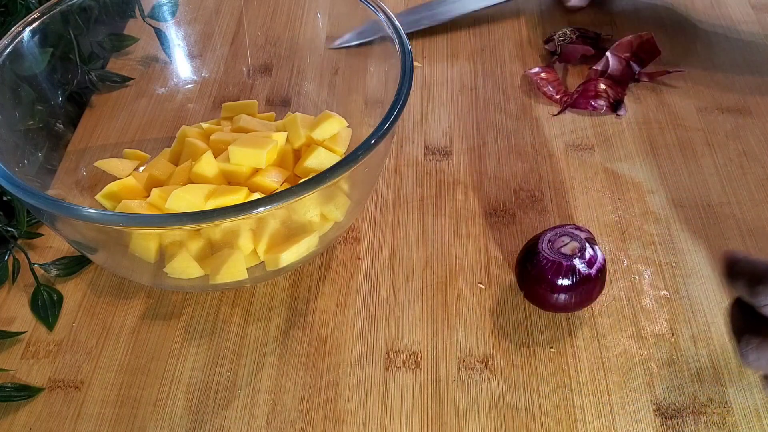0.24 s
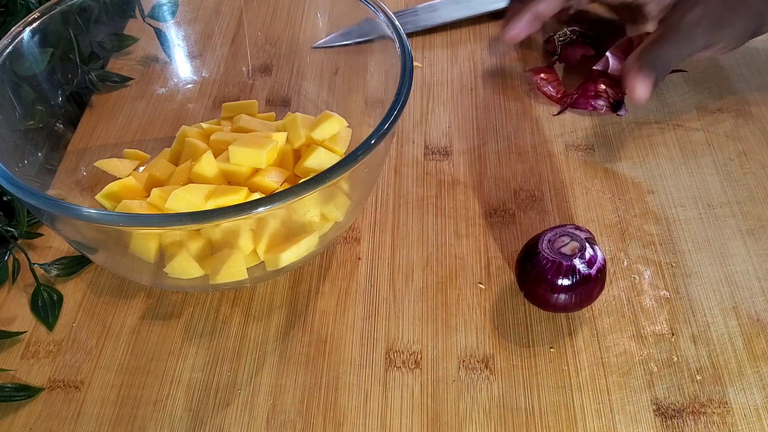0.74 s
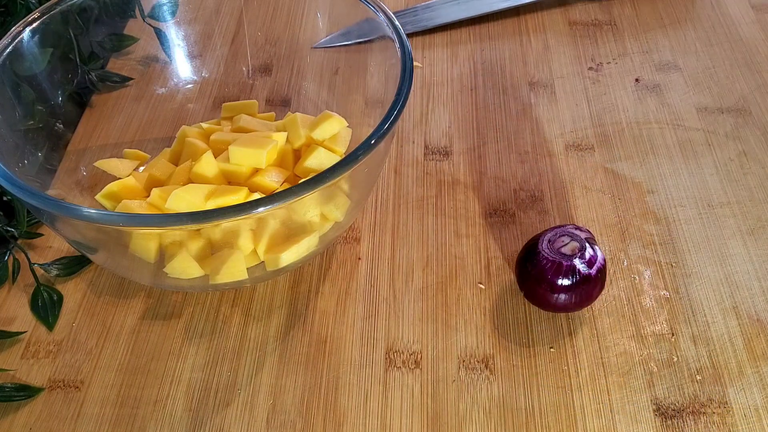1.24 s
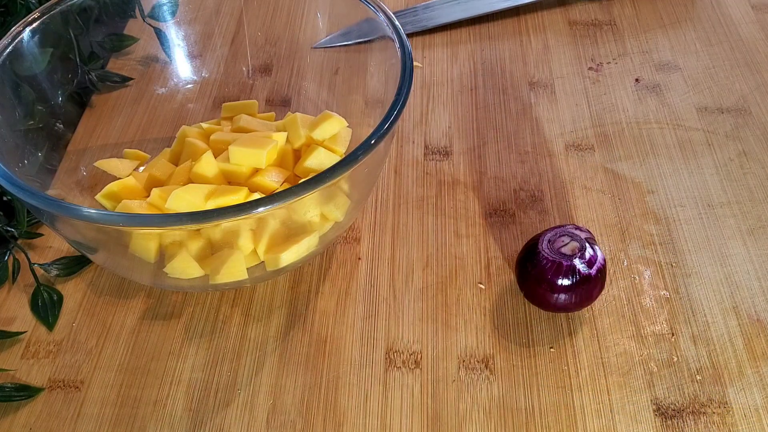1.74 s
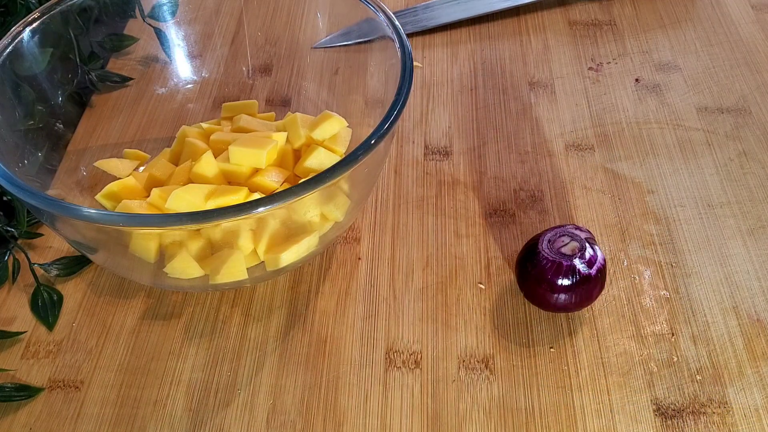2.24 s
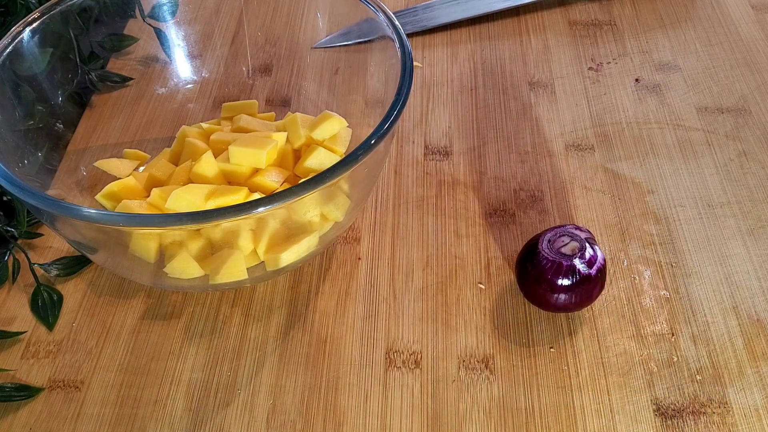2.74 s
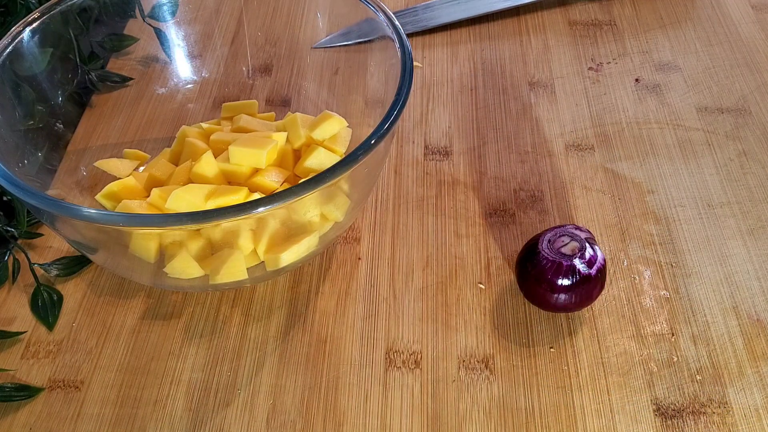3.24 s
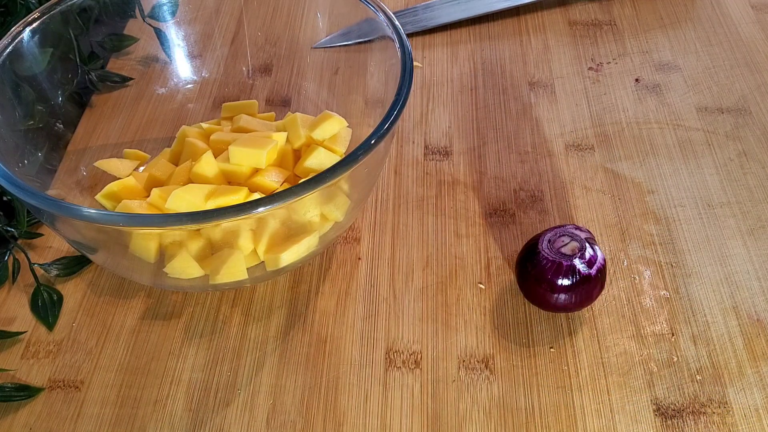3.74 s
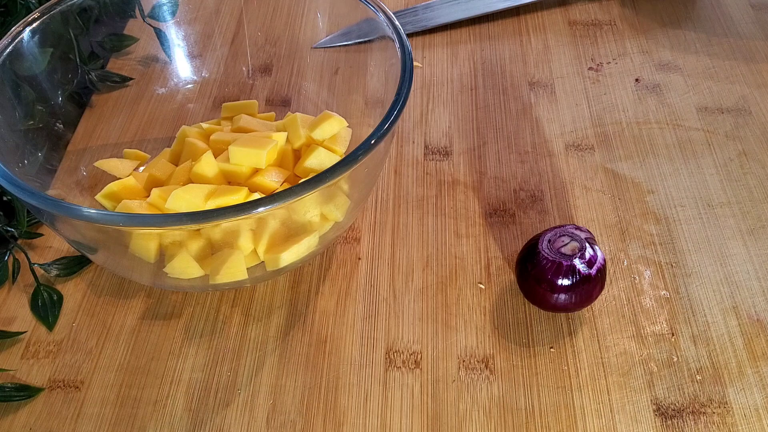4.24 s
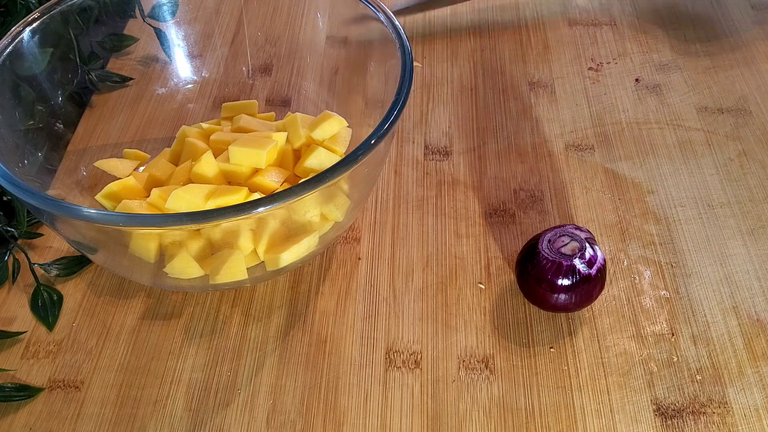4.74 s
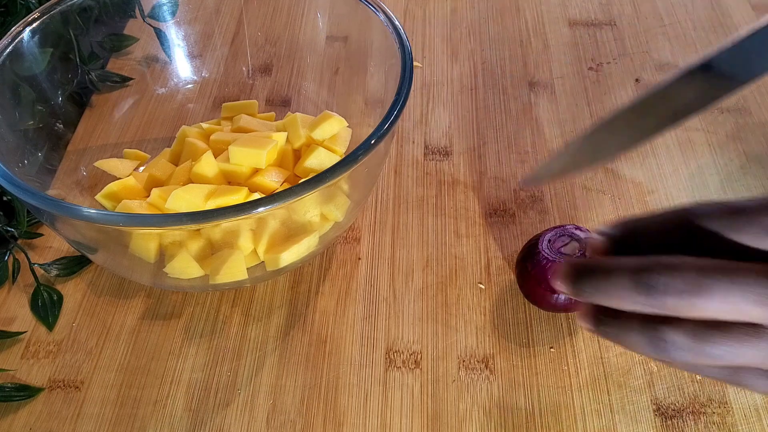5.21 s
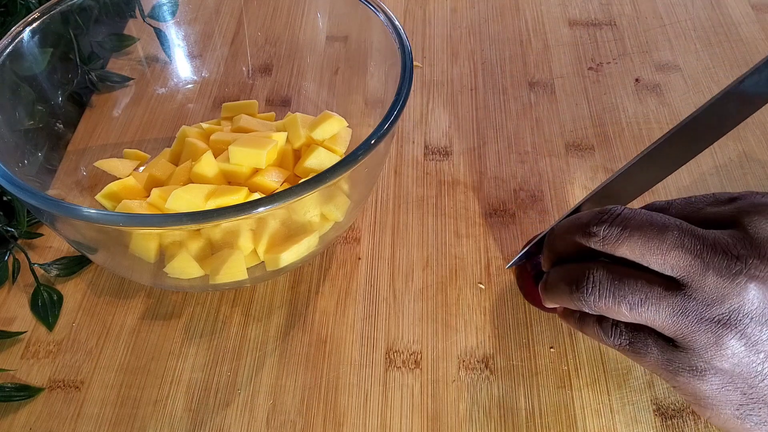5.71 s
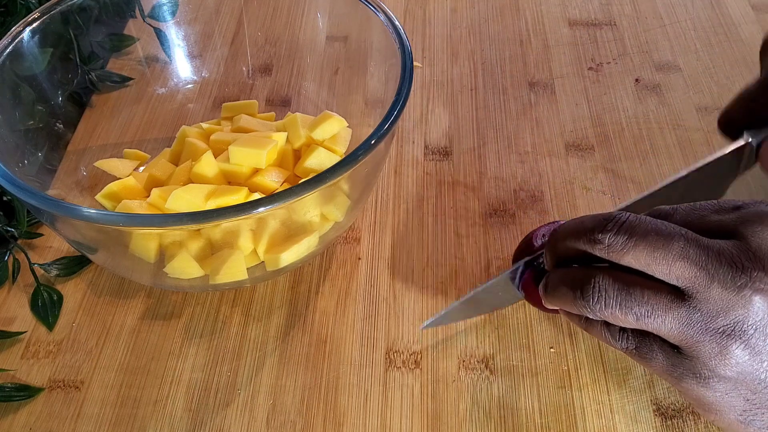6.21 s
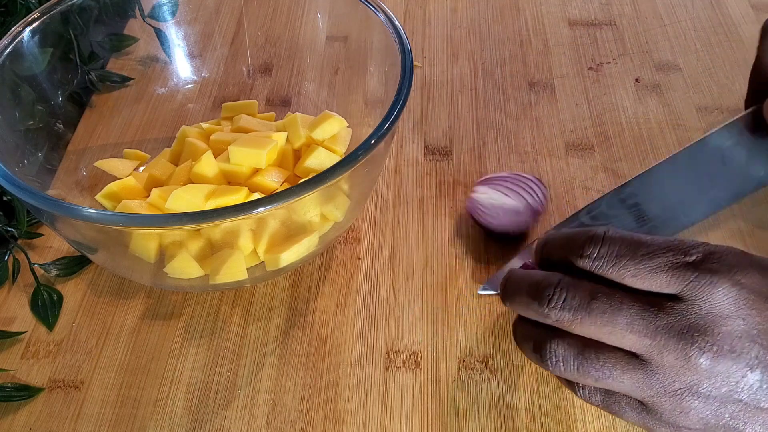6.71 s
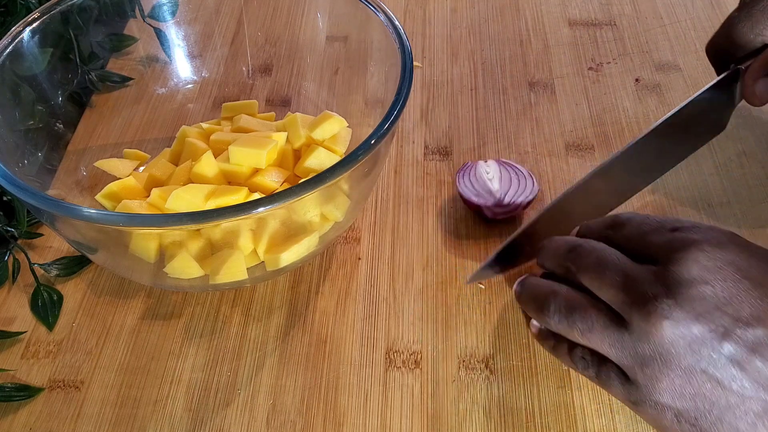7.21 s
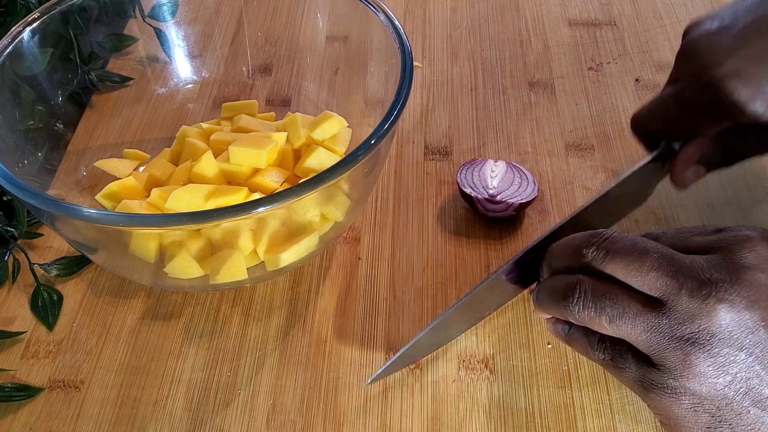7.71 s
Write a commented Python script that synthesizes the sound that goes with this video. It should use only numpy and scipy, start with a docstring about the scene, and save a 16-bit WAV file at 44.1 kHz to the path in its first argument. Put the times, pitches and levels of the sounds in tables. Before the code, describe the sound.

In a kitchen, a knife lands on a wooden board with a very loud, ringing double clack and soft thuds. Papery onion skins crackle close by, then rustle faintly across the room among small bumps. The knife is lifted with a light knock, crunches crisply through the onion and hits the board hard, followed by lighter knocks and scrapes. Close stereo microphones, short room reverberation, quiet low hum.

```python
"""First a knife rings and knocks as it is laid on a wooden board in a kitchen; dry onion skins crackle, then rustle
across the room among bumps. The knife is picked up again, crunches through the onion, knocks and scrapes.
A low hum runs underneath. Struck bodies are sums of dying sine waves (modes); crunches, scrapes and rustles
are tiny random snaps over noise, coloured and shaped by each movement; the hum is a few wavering sines."""
import sys
import numpy as np
from scipy import signal
from scipy.fft import rfft, irfft, next_fast_len
from scipy.io import wavfile

SR = 44100
rng = np.random.default_rng(int(sys.argv[2]) if len(sys.argv) > 2 else 0)


def master_out(mix):
    """Clip the mix to full scale and print it as 16-bit PCM to the path in sys.argv[1]."""
    frames = np.transpose(np.atleast_2d(mix))
    ceiling = np.clip(frames, -1, 1)
    pcm = np.round(ceiling * 32767).astype(np.int16)
    wavfile.write(sys.argv[1], SR, pcm)


N = 351036  # length in samples

# The knife meets the board: t/s, level/dB, contact cut-off f/Hz, then levels within the blow:
# counter thump/dB, board belly/dB, crack/dB, blade ring/dB, and the share sent to the room/dB
KNOCKS = [(0.1509, 4.5, 3770, -3.5, -10.5, 0, -38, -5.5), (0.155, -6, 12800, -11.5, -35, 5, -3, 2),
          (0.182, -7, 1980, -12, -6, -8, -3, 1.5), (4.508, -27.5, 3470, 7.5, -0.5, -10, -14, -4.5),
          (5.8341, 1, 1650, -1, 4, 12, -15, -10.5), (6.6822, -14.5, 4670, 5.5, 0.5, 0.5, 6.5, -6),
          (7.148, -4.5, 1830, 3, -1.5, -1.5, -12.5, -1), (7.893, -12, 1970, 1, 3.5, -5, 0, -6.5)]
# Hand, handle and onion bump softly on the board: t/s, level/dB, contact cut-off f/Hz
THUDS = [(0.31, -20.5, 501), (0.343, -19.5, 501), (0.42, -24, 463), (0.456, -25, 300), (0.775, -21.5, 170),
         (4.749, -32.5, 350), (4.871, -29.5, 105), (4.952, -30.5, 121), (5.278, -18.5, 118),
         (5.67, -23.5, 150), (5.764, -23.5, 337), (6.893, -22, 222), (7.084, -32.5, 200)]
# Levels within every thud, and its share sent to the room
THUD_THUMP_DB, THUD_BELLY_DB, THUD_STEEL_DB, THUD_ROOM_DB = 5.5, -1, -24, -1.5

# Modes, before a blow sets their levels: f/Hz, level/dB, time to fall by 60 dB/s
COUNTER_MODES = [(104.3, -21.5, 0.28), (148, -23.5, 0.14), (203, -21, 0.055)]  # counter under the board
BELLY_MODES = [(342.6, -20.5, 0.065), (431, -16, .085), (489.3, -14.5, 0.052), (631, -19, 0.059)]  # the board's belly
BOARD_MODES = [(790, -17, 0.052), (1083.6, -16, 0.042), (1146, -18.5, 0.11), (1254, -15, 0.04),
               (1585, -18.5, 0.053), (1870, -24, 0.03), (2544, -25, 0.036), (2930, -24, 0.043),
               (3905, -28.5, .02)]  # the board's stiffer bending
BLADE_MODES = [(926, -26, 0.25), (1199.4, -30.5, .18), (1820, -39.5, 0.62), (1990, -34.5, 0.21),
               (2350, -30.5, 0.2), (2560, -43, 0.25), (3250, -41.5, 0.29), (4200, -36, 0.2),
               (5170, -40.5, .33), (6105, -42, .25), (7480, -44.5, .25), (8345, -43, .3),
               (9670, -35.5, 0.27), (10800, -35, .25), (14550, -39.5, .2)]  # steel blade
# The free blade as it is swung in, and as it is lifted off the board: f/Hz, relative level/dB, 60 dB fall time/s
SWUNG = [(1066, -8.5, 0.33), (1470, -5, 0.22), (2358, -13, 0.3), (3880, -22, 0.36), (4452, -15, 0.13),
         (5300, -2.5, 0.25), (5701, -18, 0.24), (6400, -22.5, 0.39), (7472, -19, 0.2), (9792, -20.5, 0.36)]
LIFTED = [(1184, -9, 0.49), (1740, -6, 0.37), (2600, -2, 0.058), (5100, -24, 0.47), (6105, -22, 0.25),
          (7100, -22, 0.64), (7530, -18, 0.3), (11180, -13, 0.23)]
# The free blade rings: t/s, level/dB, its modes
CLINKS = [(0., -31.5, SWUNG), (4.509, -41, LIFTED)]

# The blade is dragged on wood or pushed through the onion:
# t/s, swell/s, hold/s, friction level/dB, body relative level/dB, brightness relative level/dB
STROKES = [(4.27, .045, .06, -61.5, 7.5, -7), (4.39, 0.015, 0.11, -53.5, 3, -2),
           (4.69, 0.05, 0.088, -59.5, 0, 0), (5.59, 0.13, .05, -45, -2, -0.5),
           (5.71, 0.12, 0.013, -32.5, -5.5, -7), (5.88, 0.025, 0.07, -40, 1.5, -3),
           (6.165, 0.01, 0.14, -60.5, 4, -5), (6.37, 0.042, 0.016, -57.5, -1, 1),
           (6.585, 0.043, 0.021, -45, 5, 1), (6.79, .05, .025, -62, -4, -9.5),
           (6.91, 0.018, .02, -63.5, 3, -2), (7.14, 0.056, 0.23, -50.5, 6, -1),
           (7.54, 0.016, 0.068, -56, 7.5, -5.5), (7.73, 0.036, 0.048, -43.5, 1, 0.5),
           (7.89, 0.033, .05, -53.5, 9, -4)]
# How strongly the blade sings, more once it is free of the onion: t/s, level relative to the friction/dB
SINGING = [(4.9, -27.5), (5.5, -18), (6.1, -15), (6.55, -19), (7.6, 1.5), (7.8, -12)]
SING_WANDER_DB, SING_WANDER_HZ = 5, 6  # size and rate of each singing mode's wandering

# The hand gathers the dry skins; then they are handled across the room:
# t/s, swell/s, hold/s, crackle or rustle level/dB, crumple relative level/dB, crispness relative level/dB
NEAR_RUSTLES = [(0.52, 0.047, 0.034, -59, 2, -3), (0.625, 0.032, 0.04, -46.5, -2, 3),
                (0.70, 0.067, 0.071, -45.5, 0, -1), (0.77, 0.098, 0.055, -41.5, -8.5, 2),
                (0.97, 0.029, 0.0093, -45, -8, -0.5)]
FAR_RUSTLES = [(1.235, 0.032, 0.25, -60.5, -6, -3), (1.305, 0.012, 0.039, -53.5, 2.5, -18.5),
               (1.60, 0.048, .13, -59, 0, 0.5), (1.82, .11, .025, -54.5, -0.5, -2),
               (2.17, 0.056, 0.075, -56.5, 4.5, -4.5), (2.32, .05, .02, -60.5, -1, -2),
               (2.60, 0.1, 0.058, -67.5, -7, 2), (2.80, 0.048, 0.041, -48.5, -7.5, -2.5),
               (3.262, 0.0065, 0.041, -42.5, -4.5, -7.5), (3.58, 0.089, 0.028, -68, 7.5, -3.5),
               (3.95, 0.068, 0.03, -77.5, 11.5, 4.5), (4.07, 0.023, 0.046, -56, 0.5, -1)]
# Faint stirring that goes on besides the far rustles: t/s, level before its random wavering/dB
FAR_STIR = [(0.9, -89), (1.15, -68), (2.5, -68), (3.1, -66), (3.5, -62.5), (3.9, -69), (4.3, -67.5),
            (4.9, -73), (5.2, -94)]
SKIN_FLUTTER_DB = 0.4

# Every rubbing movement swells, holds and dies away, the treble first
SWELL_DB = 19  # gained during the swell
BODY_FALL_DB_PER_S, MIDDLE_FALL_DB_PER_S, TOP_FALL_DB_PER_S = 144, 163, 199

# Brief bumps and ticks away from the board:
# t/s, level before the direct and room shares/dB, lowest f/Hz, highest f/Hz, length/s
HANDLING = [(0.0, -29, 250, 6350, 0.0074), (1.311, -42, 500, 1550, 0.012),
            (1.501, -48, 3900, 10900, 0.0043), (1.666, -47, 1900, 3500, 0.0034),
            (1.69, -48, 500, 623, 0.012), (2.157, -51, 900, 3300, 0.017), (2.214, -33.5, 100, 740, 0.0045),
            (2.686, -64.5, 2930, 3520, 0.016), (2.817, -41, 273, 1110, 0.02),
            (3.135, -47, 710, 1296, 0.016), (4.293, -47, 400, 1740, 0.0036),
            (5.03, -49, 4460, 14200, 0.0017), (7.083, -61, 2500, 14240, 0.0024)]

# Spectrum shapes: f/Hz, relative level/dB
SKIN_COLOUR = [(150, -30.5), (250, -10), (444, -7), (674, -11), (1260, 0), (2020, -6), (3060, -0.5),
               (3460, -5), (5070, -1.5), (15200, -12), (16000, -6.5)]  # skins close by
FAR_COLOUR = [(470, -17.5), (800, 0.5), (1240, 3.5), (1900, 1), (2800, -0.5), (3650, -6), (4290, -5),
              (6820, -3), (10400, -7.5), (16000, -14.5)]  # skins across the room
CUT_COLOUR = [(120, -8), (250, -8), (460, -3), (880, -9.5), (1200, -3), (2000, -9.5), (2600, -2),
              (4700, -4), (7000, -7), (10000, -8), (16000, -12.5)]  # cutting and scraping
AIR_COLOUR = [(15, -40.5), (30, -21.5), (54, 0.5), (70, -3.5), (107, -5), (122, -2), (139, -13.5),
              (202, -10.5), (275, -22.5), (328, -12.5), (412, -16), (543, -14.5), (579, -8), (775, -25),
              (1200, -31), (1560, -71), (2640, -120)]  # low air noise
HISS_COLOUR = [(700, 5.5), (1500, -3), (3000, -8), (8000, -5), (16000, -7.5)]  # high background noise
AIR_DB, HISS_DB = -59, -72.5
# Hum tones of the appliance: f/Hz, level/dB
HUM = [(48.7, -63.5), (104, -80.5), (166, -72), (300, -73), (328, -74)]

# How long the room rings: f/Hz, 60 dB fall time/s
ROOM_T60 = [(100, 0.41), (300, 0.43), (1000, 0.41), (3000, 0.51), (7000, 0.45), (15000, 0.11)]
# How alike left and right are in a diffuse sound: f/Hz, likeness (1 = same, 0 = unrelated)
LIKENESS = [(60, 1), (130, .85), (290, 0.56), (640, 0.74), (1400, 0), (16000, 0)]
# Colour difference of the two microphones: f/Hz, left minus right level/dB
BALANCE = [(60, 2), (200, -0.5), (600, 0), (1300, -3), (2400, -4), (4400, -3), (8000, 2), (15000, -0.5)]
FLAT = [(20, 0), (20000, 0)]  # an even spectrum: f/Hz, level/dB
CUTOFF_HZ = 15900  # nearly everything above is removed


def knocks():
    """Hard knocks of the knife and soft thuds shake the board; the room adds their reflections."""
    direct, to_room = np.zeros((2, 2, N))
    for s, db, contact_hz, thump_db, belly_db, crack_db, blade_db, room_db in KNOCKS:
        knock = from_db(db) * blow(contact_hz, thump_db, belly_db, crack_db, blade_db)
        add(direct, s, knock)
        add(to_room, s, from_db(room_db) * knock)
    for s, db, contact_hz in THUDS:
        thud = from_db(db) * blow(contact_hz, THUD_THUMP_DB, THUD_BELLY_DB, THUD_STEEL_DB, THUD_STEEL_DB)
        add(direct, s, thud)
        add(to_room, s, from_db(THUD_ROOM_DB) * thud)
    return direct + kitchen(to_room)


def blow(contact_hz, thump_db, belly_db, crack_db, blade_db):
    """One blow rings counter, board and blade; a soft contact leaves only the low modes."""
    belly = from_db(belly_db) * ringing(BELLY_MODES, scatter_db=1.4)
    dense_wood = burst(db=-16.5, t60=0.085, band_hz=[520, 1900])
    wood = ringing(BOARD_MODES, scatter_db=5.9) + belly + dense_wood
    thump = from_db(thump_db) * ringing(COUNTER_MODES, scatter_db=1.0)
    crack = from_db(crack_db) * burst(db=-17.0, t60=0.052, band_hz=[1300, 15000])
    steel = from_db(blade_db) * ringing(BLADE_MODES, scatter_db=4.5) + crack
    softened = butter(wood - thump + steel, contact_hz, "low")
    return butter(softened, 60, "high")


def ringing(modes, scatter_db, lag_s=0.00026, lag_spread_s=0.0001):
    """Half a second of a struck body's modes: level varies by chance, and the left ear may hear them later."""
    t, out = np.arange(SR // 2) / SR, 0
    for k, (hz, db, t60) in enumerate(modes):
        gain = (-1) ** k * from_db(db + scatter_db * rng.normal())  # neighbours start in opposite directions
        decay = np.exp(-np.log(1000) * t / t60)
        mode = gain * decay * np.sin(2 * np.pi * hz * t)
        lag = abs(lag_s + lag_spread_s * rng.normal())
        left = np.interp(t - lag, t, mode)
        out = out + np.array([left, mode])
    return out


def burst(db, t60, band_hz):
    """Modes too dense to tell apart: a band of noise that dies fast."""
    t = np.arange(SR // 2) / SR
    noise = rms_one(butter(rng.standard_normal((2, len(t))), band_hz, "band"))
    return from_db(db - 60 * t / t60) * noise


def clink():
    """The free blade rings out, with weaker reflections from the room."""
    out = np.zeros((2, N))
    for s, db, modes in CLINKS:
        add(out, s, from_db(db) * ringing(modes, scatter_db=0, lag_s=0, lag_spread_s=0))
    return out + from_db(-10) * kitchen(out)


def slicing(sing_width_hz=90):
    """Cells burst and steel rubs on wood; the friction makes the blade's upper modes sing, now one, now another."""
    texture = stereo(grains(per_s=1400, size_db=3.0, smooth=0.45), CUT_COLOUR)
    sing = 0
    for hz, _, _ in BLADE_MODES:
        if hz > 4000:
            b, a = signal.iirpeak(hz, hz / sing_width_hz, fs=SR)
            wander = from_db(SING_WANDER_DB * drift(SING_WANDER_HZ))
            sing = sing + wander * hz * signal.lfilter(b, a, texture)  # higher modes count for more
    texture = texture + from_db(curve(SINGING)) * rms_one(sing)
    return friction(STROKES, texture, flutter_db=0.55)


def skins():
    """Papery skins crackle in tiny snaps under the hand, then faintly from across the room."""
    near = stereo(grains(per_s=1600, size_db=1.0, smooth=0.71), SKIN_COLOUR)
    far = stereo(grains(per_s=810, size_db=3.5, smooth=1.7), FAR_COLOUR)
    near_rustles = friction(NEAR_RUSTLES, near, SKIN_FLUTTER_DB)
    far_rustles = friction(FAR_RUSTLES, far, SKIN_FLUTTER_DB)
    stir = from_db(curve(FAR_STIR) + 1.5 * drift(8))
    return near_rustles + far_rustles + stir * far


def grains(per_s, size_db, smooth):
    """Tiny fractures of uneven size, each scattered for a few ms by nearby surfaces, over smooth friction."""
    happens = rng.random(N) < per_s / SR
    size = from_db(size_db * np.minimum(rng.exponential(1, N), 4))
    snaps = happens * size * rng.choice([-1, 1], N)
    t = np.arange(SR // 50) / SR
    scatter = rng.standard_normal((2, len(t))) * np.exp(-t / 0.0066)
    crackle = signal.oaconvolve(snaps[None], scatter, axes=1)[:, :N]
    return rms_one(crackle) + smooth * rng.standard_normal((2, N))


def friction(rows, texture, flutter_db):
    """Grain noise follows the movements: pressure brings out its body, speed its brightness; registers flutter."""
    *_, body_db, bright_db = np.transpose(rows)
    low = rms_one(butter(texture, 2300, "low", order=4))
    mid = rms_one(butter(texture, [2000, 6000], "band"))
    high = rms_one(butter(texture, 7900, "high", order=3))
    body = movements(rows, BODY_FALL_DB_PER_S, body_db) * low
    middle = movements(rows, MIDDLE_FALL_DB_PER_S, 0) * mid
    top = movements(rows, TOP_FALL_DB_PER_S, bright_db) * high
    together = sum(from_db(flutter_db * drift(30)) * register for register in (body, middle, top))
    return from_db(flutter_db * drift(9.9)) * together


def movements(rows, fall_db_per_s, colour_db):
    """Gain of a run of movements: each swells, holds and falls; where they overlap their powers add."""
    t = np.arange(0, N, 40) / SR  # every 40th sample is enough
    s, swell, hold, db = np.array(rows).T[:4, :, None]
    since_full = t - s - swell
    rise_db = np.minimum(SWELL_DB * since_full / swell, 0)
    fall_db = fall_db_per_s * np.maximum(since_full - hold, 0)
    shape_db = np.maximum(rise_db - fall_db, -120)
    gains = from_db(db + np.reshape(colour_db, (-1, 1)) + shape_db)
    return np.interp(np.arange(N) / SR, t, np.sqrt(np.sum(gains ** 2, axis=0)))


def handling(direct_db=-3, room_db=-1):
    """Brief rubs and bumps: short swells of filtered noise, heard largely by way of the room."""
    out, t = np.zeros((2, N)), np.arange(SR // 2) / SR
    for s, db, low_hz, high_hz, length in HANDLING:
        noise = stereo(rng.standard_normal((2, len(t))), FLAT)
        band_hz = [low_hz, max(high_hz, low_hz * 1.15)]
        rub = rms_one(butter(noise, band_hz, "band", order=3))
        shape = np.sqrt(2 * np.e * t / length) * np.exp(-t / length)  # peaks at 1
        add(out, s, from_db(db) * rub * shape)
    return from_db(direct_db) * out + from_db(room_db) * kitchen(out)


def background(waver=0.59):
    """An appliance hums in sines whose phase wavers (radians), over soft air noise and hiss."""
    t, hum = np.arange(N) / SR, 0
    for hz, db in HUM:
        phase = 2 * np.pi * hz * t + waver * drift(2)
        hum = hum + from_db(db) * np.sqrt(2) * np.sin(phase)
    air = from_db(AIR_DB) * stereo(rng.standard_normal((2, N)), AIR_COLOUR)
    hiss = from_db(HISS_DB) * stereo(rng.standard_normal((2, N)), HISS_COLOUR)
    return hum + air + hiss


def kitchen(x, gap_s=0.0021):
    """Diffuse reflections of the left signal that start after a short gap; each band dies at its own pace."""
    t, edges = np.arange(SR) / SR, 45 * 2 ** np.arange(0, 9.5, 0.5)  # half-octave bands
    field = rfft(stereo(rng.standard_normal((2, SR)), FLAT))
    hz, tail = np.arange(field.shape[1]), 0
    onset = np.clip(t / gap_s - 1, 0, 1)
    for low, high in zip(edges, edges[1:]):
        inside = (hz >= low) & (hz < high)
        decay = from_db(-60 * t / at_hz(ROOM_T60, np.sqrt(low * high)))
        band = irfft(field * inside, SR) * decay * onset
        # each band carries energy in proportion to its width
        tail = tail + band * np.sqrt(inside.mean() / np.sum(band ** 2, axis=1, keepdims=True))
    return signal.oaconvolve(x[:1], tail, axes=1)[:, :N]


def stereo(pair, spectrum):
    """Two unrelated signals become a coloured diffuse field, left and right as alike as LIKENESS says; rms 1."""
    size = next_fast_len(pair.shape[-1])
    hz = np.arange(size // 2 + 1) * SR / size
    mid, side = rfft(pair, size)
    alike = np.clip(at_hz(LIKENESS, hz), -1, 1)
    both = np.sqrt(1 + alike) * mid + np.sqrt(1 - alike) * side * [[1], [-1]]
    coloured = irfft(both * from_db(at_hz(spectrum, hz)), size)
    return rms_one(coloured[:, :pair.shape[-1]])


def drift(rate_hz):
    """Slow random wandering of rms 1: noise smoothed by two equal low-pass steps."""
    r = np.exp(-80 * np.pi * rate_hz / SR)  # worked out at every 40th sample
    noise = rng.standard_normal(N // 40 + 2002)
    slow = signal.lfilter([1], [1, -2 * r, r * r], noise)[2000:]  # skip the filter's start
    return np.interp(np.arange(N) / 40, np.arange(len(slow)), rms_one(slow))


def butter(x, hz, kind, order=2):
    """Filter that keeps the low, high or band part of a sound."""
    sos = signal.butter(order, np.clip(hz, 10, 0.45 * SR), kind, fs=SR, output="sos")
    return signal.sosfilt(sos, x)


def add(out, s, sound):
    """Mix a sound in at a time in seconds."""
    start = max(round(s * SR), 0)
    out[..., start:start + sound.shape[-1]] += sound[..., :N - start]


def curve(points):
    """A curve of time and level, read at every sample."""
    s, db = np.transpose(points)
    return np.interp(np.arange(N) / SR, s, db)


def at_hz(points, hz):
    """A table read on a log-frequency axis."""
    table_hz, values = np.transpose(points)
    return np.interp(np.log(np.maximum(hz, 1)), np.log(table_hz), values)


def from_db(db):
    """Decibels to a plain gain."""
    return 10 ** (np.asarray(db) / 20)


def rms_one(x):
    """Scale a sound to an average strength (rms) of 1."""
    return x / np.sqrt(np.mean(x ** 2) + 1e-20)


def scene():
    """Everything in the kitchen, added together."""
    return knocks() + clink() + slicing() + skins() + handling() + background()


def record(dry):
    """The two microphones differ in colour; peaks are clipped and the top is cut."""
    size = next_fast_len(N + SR // 4)
    tilt_db = at_hz(BALANCE, np.arange(size // 2 + 1) * SR / size)
    colour = from_db(tilt_db * [[0.5], [-0.5]])  # half the difference to each side
    heard = irfft(rfft(dry, size) * colour, size)[:, :N]
    top_cut = signal.ellip(10, 0.1, 80, CUTOFF_HZ, fs=SR, output="sos")
    return signal.sosfilt(top_cut, np.clip(heard, -1, 1))


dry = scene()
out = record(dry)
master_out(out)
```